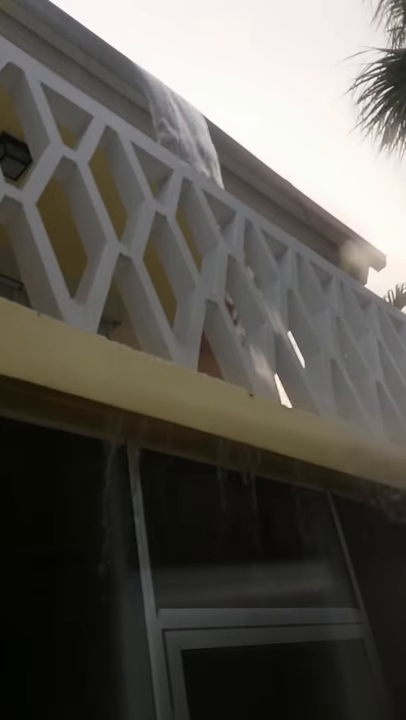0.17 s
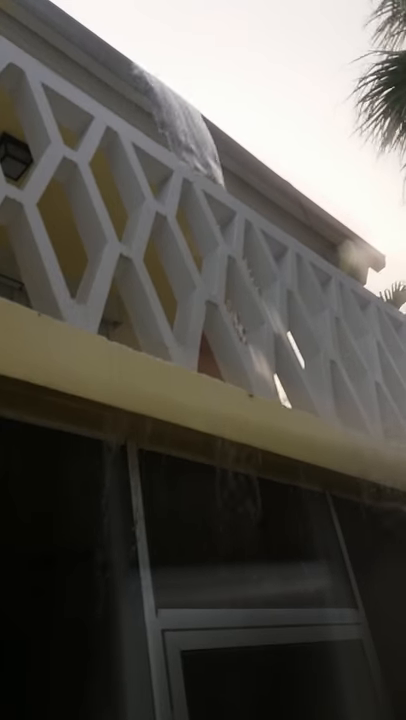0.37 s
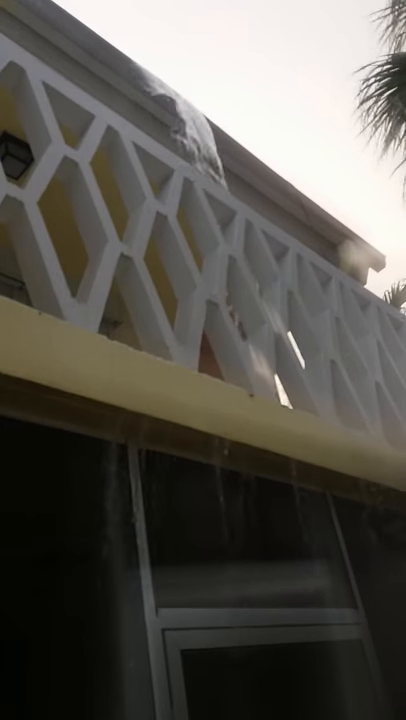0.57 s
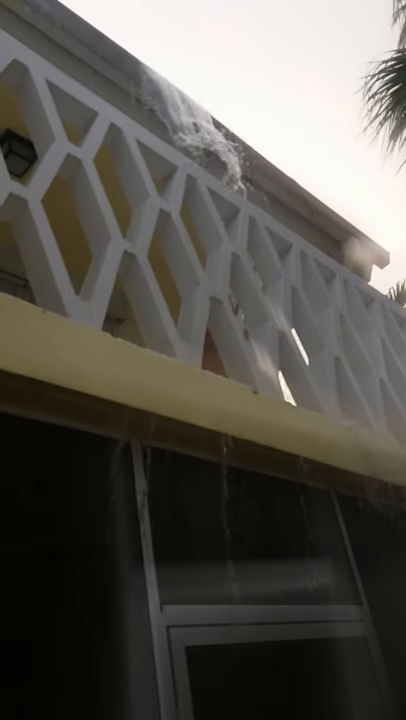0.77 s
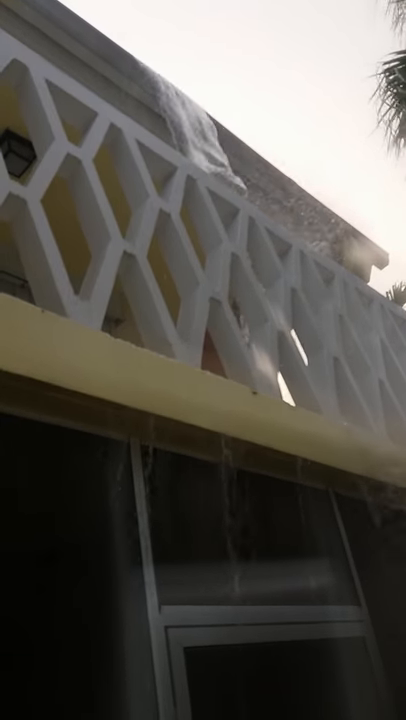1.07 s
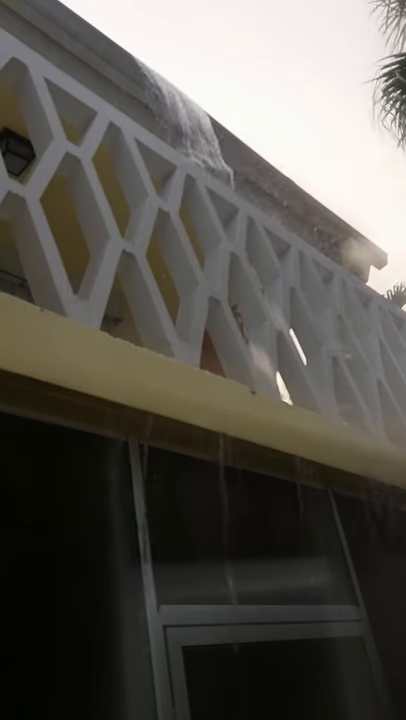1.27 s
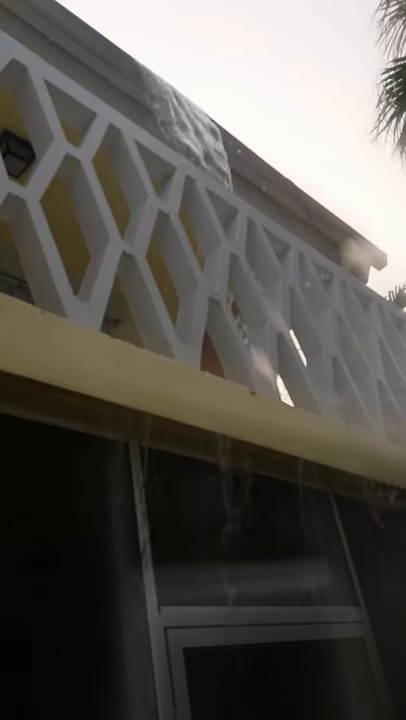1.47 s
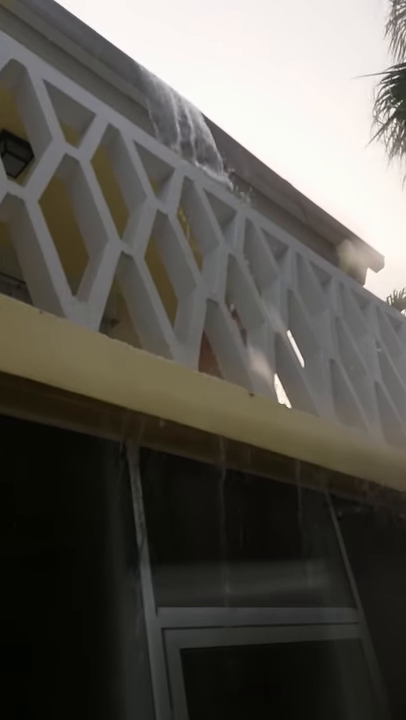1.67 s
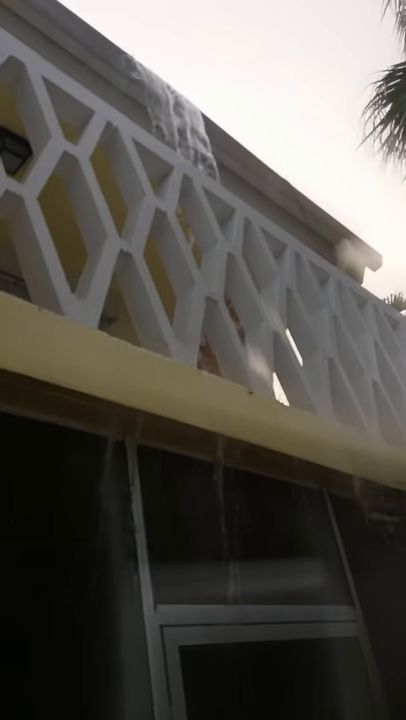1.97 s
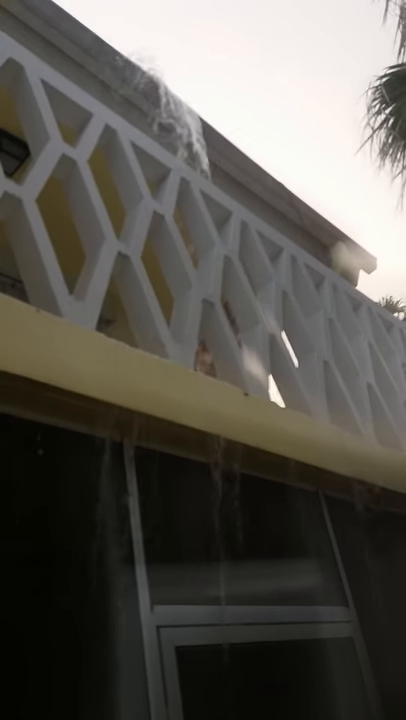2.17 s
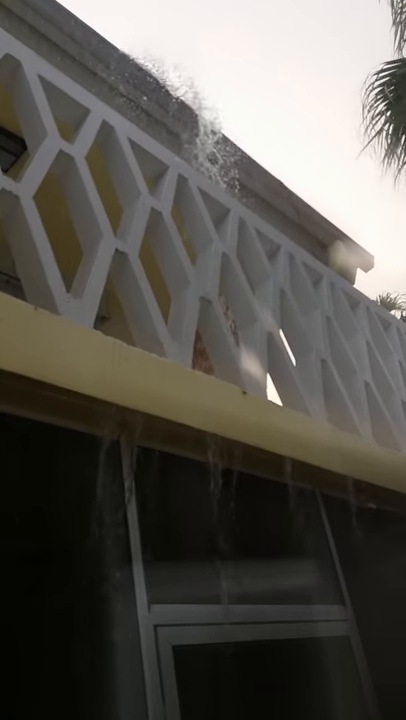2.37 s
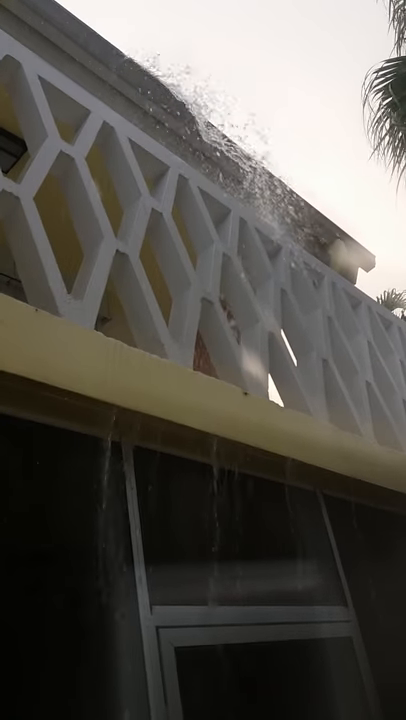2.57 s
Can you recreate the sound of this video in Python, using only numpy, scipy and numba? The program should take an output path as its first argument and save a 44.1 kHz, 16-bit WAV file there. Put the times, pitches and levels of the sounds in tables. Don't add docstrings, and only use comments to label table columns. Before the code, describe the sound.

Water pours off a roof gutter and splatters on a hard ledge, crackling, hissing and plinking; a drop knocks the phone early, the flow thins, then surges. Close outdoor stereo phone pickup, faint distant hum.

```python
import sys
import numpy as np
from scipy import signal
from scipy.fft import rfft, irfft
from scipy.io import wavfile
from scipy.ndimage import uniform_filter1d
from numba import njit

SR = 44100
rng = np.random.default_rng(int(sys.argv[2]) if len(sys.argv) > 2 else 0)


def volts(x):
    e = np.asarray(x, float) / 20
    return 10 ** e


def transcribe(u):
    v = np.clip(np.atleast_2d(u).T, -1, 1)
    q = np.round(v * 32767).astype(np.int16)
    wavfile.write(sys.argv[1], SR, q)


N = 120393

# f/Hz, level/dB
RUMBLE_COLOUR = [(15, -63), (25, -21), (75, -0.5), (130, -1.5), (243, 2), (291, 1.5), (358, 1.5),
                 (700, -8.5), (910, -4), (1540, -120)]
# f/Hz, level/dB rms, rise/(dB/s), dip t/s, dip span/s, dip depth/dB
HUM_PARTIALS = [
    (298.4, -56, 1, 1.87, 0.29, -19),
    (447.4, -68.5, 5.5, 0.91, .3, -11),
    (595, -90.5, 11.5, 1.1, .4, -7),
]
# t/s, peak level/dB, f/Hz, spread/s
PLINKS = [(0.031, -19, 2200, 0.0018), (0.105, -17, 2030, 0.014), (0.177, -27, 1920, 0.004),
          (0.208, -21, 1970.0, 0.0094), (0.321, -16, 3230, 0.0115), (0.361, -20, 2260, 0.018),
          (0.385, -20, 2770, 0.0013), (0.428, -19, 2070.0, 0.012), (0.546, -28, 2450.0, 0.01225),
          (0.708, -16.5, 1870, 0.01), (0.731, -17.0, 1985, 0.0024), (0.742, -19, 2370, 0.0012),
          (0.842, -31, 1850.0, 0.0015), (0.842, -18.0, 1710, 0.01362), (0.961, -19, 1680.0, 0.0026),
          (1.011, -25.5, 1710, 0.0175), (1.039, -25.0, 2270.0, 0.0027), (1.051, -28, 1820.0, 0.0018),
          (1.112, -24.0, 1820.0, 0.0024), (1.154, -21, 3000.0, 0.0025), (1.205, -28.5, 2340, 0.0037),
          (1.225, -30.0, 2290.0, 0.0044), (1.268, -29, 1980.0, 0.0055), (1.308, -23, 1940, 0.0106),
          (1.331, -19, 1830, 0.0053), (1.341, -20, 2580.0, 0.00834), (1.362, -24.5, 1710, 0.00346),
          (1.457, -24.5, 2530.0, 0.0069), (1.568, -26, 1570.0, 0.0061), (1.6, -35, 2820.0, 0.012),
          (1.635, -27, 2030.0, 0.0048), (1.718, -22.5, 2430.0, 0.0031), (1.736, -26.0, 2780.0, 0.0024),
          (1.856, -24.5, 2460, 0.005), (1.917, -25, 3110.0, 0.0098), (2.023, -26.5, 2470.0, 0.0115),
          (2.056, -17, 1700.0, 0.011), (2.071, -24.0, 2800, 0.0085), (2.133, -20.5, 1700.0, 0.0047),
          (2.209, -11, 1640, 0.004), (2.256, -23, 2660.0, 0.00405), (2.284, -10.5, 1880, 0.00458),
          (2.441, -25, 2370.0, 0.0108), (2.504, -27, 1580.0, 0.011), (2.565, -25, 2020.0, 0.0091),
          (2.597, -19.5, 1710.0, 0.0085), (2.632, -19, 2320, 0.0034),
          (.37, -20, 2500, .014), (0.386, -21, 2720, 0.015), (.435, -17, 2340, 0.0096),
           (.555, -25, 1700, .015), (.62, -22, 1800, 0.032), (.712, -19.5, 2250, .012),
           (.72, -17, 1950, 0.019), (.738, -24.5, 1900, 0.026), (.762, -22, 720, 0.012),
           (.85, -21, 1720, 0.0035), (2.065, -25, 1750, 0.024), (2.195, -27, 2120, .01),
           (2.215, -19, 850, 0.0055), (2.217, -18, 2300, .018), (2.29, -23, 1890, 0.019),
           (2.324, -21.5, 1850, 0.015), (2.606, -17, 1910, .022)]
# t/s, peak level/dB, spread/s
SPLASHES = [(0.028, 3.5, 0.00167), (0.054, 3.0, 0.004), (0.068, 1, 0.0019), (0.077, 2.5, 0.0105),
            (0.106, 2.5, 0.0058), (0.175, 2.5, 0.0026), (0.193, 2, 0.004), (0.341, 0, 0.00202),
            (0.373, 4.5, 0.0036), (0.417, 1, 0.0038), (0.429, 1, 0.0014), (0.545, 4.5, 0.01222),
            (0.626, 1.0, 0.0072), (0.698, 3, 0.00216), (0.721, 5.0, 0.0056), (0.74, -6, 0.0032),
            (0.833, -4, 0.0015), (0.83, 1.0, 0.017), (0.909, -4.5, 0.014), (0.961, 0, 0.0022),
            (0.986, -3.0, 0.0028), (1.007, 0.5, 0.01575), (1.033, 1.0, 0.00357), (1.048, -0.5, 0.0014),
            (1.061, -5.0, 0.0014), (1.111, -2.5, 0.0083), (1.16, -8, 0.0053), (1.268, -6, 0.0044),
            (1.33, -1.5, 0.019), (1.378, -3, 0.0014), (1.417, -8, 0.00557), (1.449, -7.5, 0.0049),
            (1.535, -7, 0.0035), (1.587, -2, 0.0014), (1.601, -0.5, 0.013), (1.624, -3, 0.0054),
            (1.727, 3, 0.0031), (1.737, 0, 0.0094), (1.787, -8, 0.0112), (1.899, -0.5, 0.0039),
            (1.915, 1, 0.0074), (1.961, -3.5, 0.0084), (2.009, -1, 0.004), (2.055, 2.0, 0.0027),
            (2.078, 1.5, 0.0015), (2.087, -0.5, 0.0013), (2.115, -5, 0.0041), (2.152, 2, 0.0013),
            (2.191, 0.5, 0.017), (2.254, 5.0, 0.0057), (2.265, 7, 0.0017), (2.281, 5.5, 0.0023),
            (2.301, 3.5, 0.0034), (2.318, 4.0, 0.0015), (2.331, 1, 0.0014), (2.399, 5.0, 0.0113),
            (2.497, 5.5, 0.0074), (2.611, 8.5, 0.0029), (2.63, 1, 0.016), (2.663, -4, 0.005)]
# t/s, level/dB, extra low gurgle level/dB
FLOW = [(0, -29.5, -1.5), (.06, -26.5, -1), (.27, -26.5, -1.5), (.38, -25, -1.5), (.54, -27, -1),
        (.6, -28, 0.5), (.72, -29, -1.5), (.85, -30, 0), (.95, -33, -2.5), (1.1, -33.5, -1),
        (1.25, -35, 0.5), (1.45, -33, 0), (1.7, -32.5, 0.5), (1.9, -29, 0), (2.15, -26.5, -0.5),
        (2.33, -25.5, 0.5), (2.55, -24, -1), (2.73, -23, 0.5)]
# f/Hz, level/dB
LEFT_COLOUR = [(150, -39), (500, -6.5), (900, -1.5), (1900, 0), (3000, -2.5), (5000, -14), (9500, -4),
               (16000, -5)]
# f/Hz, level/dB
RIGHT_COLOUR = [(150, -26), (500, -10), (1000, -2), (1900, -0.5), (2700, 1.5), (6000, 5.5), (9800, 0.5),
                (16000, 2.5)]
# f/Hz, width/Hz, level/dB
PORT_PEAKS = [
    (7930, 1750, 12),
    (7614, 1420, 8),
]

LEFT_LAG_S = .00043
KNOCK_S = .5985


def unit(x):
    return x / np.sqrt(np.mean(x ** 2))


def butter(x, order, hz, kind="low"):
    return signal.sosfilt(signal.butter(order, hz, kind, fs=SR, output="sos"), x)


def walk(rate_hz):
    hold = int(SR / rate_hz)
    levels = np.repeat(rng.standard_normal(N // hold + 1), hold)
    w = uniform_filter1d(levels, hold)[:N]
    return w / w.std()


def gain_at(table, hz):
    table_hz, table_db = np.array(table).T
    return np.interp(np.log(hz + 1), np.log(table_hz), table_db)


def colour(x, db_of):
    cepstrum = irfft(db_of(np.fft.rfftfreq(2048, 1 / SR)) * np.log(10) / 20)
    cepstrum[1:1024] *= 2
    cepstrum[1025:] = 0
    return signal.fftconvolve(x, irfft(np.exp(rfft(cepstrum))))[:N]


@njit
def grains(at_s, lag_s, hz, cycles, size, glide, n, sr):
    lead_in = 64
    out = np.zeros((2, n + 4096))
    for g in range(len(at_s)):
        for c in range(2):
            place = at_s[g] * sr + (lag_s[g] * sr if c == 0 else 0.) + lead_in
            i = int(place)
            w = 2 * np.pi * hz[g] / sr
            step = np.exp(1j * w - w / cycles[g])
            rise = np.exp(1j * w * w * glide / cycles[g] / 6)
            z = size[c, g] * step ** (1 - place + i)
            for k in range(min(int(6 * cycles[g] / w) + 1, 3000)):
                out[c, i + 1 + k] += z.imag
                z *= step
                step *= rise
    return out[:, lead_in:n + lead_in]


def drops(at_s, lo_hz, cycles, scatter_db, glide, size=1.):
    n = len(at_s)
    pitch, source, rank, sign = rng.random((n, 4)).T
    lag_g, cycles_g, pan_g = rng.standard_normal((n, 3)).T
    hz = lo_hz * (18000 / lo_hz) ** pitch
    lag_spread_s = np.where(source < .35, .00003, .0013)
    lag_s = np.clip(LEFT_LAG_S + lag_g * lag_spread_s, -.0014, .004)
    rarity = -np.log(rank + .007)
    big = size * volts(scatter_db * rarity) * hz / 1000 * np.sign(sign - .5)
    big = big * volts(np.outer([1, -1], 0.76 * pan_g))
    return grains(np.clip(at_s, 0, N / SR), lag_s, hz, cycles * volts(1.3 * cycles_g), big, glide, N, float(SR))


def rumble_db(hz):
    return np.where(hz < 1399, gain_at(RUMBLE_COLOUR, hz), -64)


def machine_hum(t):
    hum = 0
    for hz, db, rise_db, dip_s, span_s, dip_db in HUM_PARTIALS:
        dip = dip_db * np.exp(-((t - dip_s) / span_s) ** 2)
        level = volts(db + rise_db * t + dip + 0.52 * walk(7.8))
        phase = 2 * np.pi * np.cumsum(hz * (1 + 0.000626 * walk(3.03))) / SR
        hum = hum + np.sqrt(2) * level * np.sin(phase)
    return hum


def breeze(t):
    level_db = np.interp(t, [0, 1.2, 1.8, 2.73], [-77, -79, -87, -51.5])
    return unit(butter(rng.standard_normal((2, N)), 2, 75)) * volts(level_db)


def town(t):
    mid = unit(colour(rng.standard_normal(N), rumble_db))
    side = unit(colour(rng.standard_normal(N), rumble_db))
    flow_s, flow_db, _ = np.array(FLOW).T
    swell = volts(0.13 * walk(4.6) + 1.02 * (np.interp(t, flow_s, flow_db) + 29.0))
    rumble = volts(-53.5) * swell * (mid + 0.15 * side * np.array([[1], [-1]]))
    drone = unit(butter(rng.standard_normal(N), 1, [118, 138], "band"))
    drone = volts(-58.5 + 1.3 * walk(5.0)) * swell ** 0.86 * drone
    return rumble + machine_hum(t) + drone + breeze(t)


def knock(t):
    start_s, stretch, fade_s = .00013, 2.95, .003
    u = np.clip(t - KNOCK_S, 0, None)
    swing = -np.sin(np.pi * np.log(1 + u / start_s) / np.log(stretch))
    swing = swing * np.exp(-u / fade_s) * (u < .03)

    def ring(hz, ring_fade_s, db):
        envelope = u / ring_fade_s * np.exp(1 - u / ring_fade_s)
        return np.sin(2 * np.pi * hz * u) * envelope * volts(db)

    left = ring(2250, .0008, -19)
    right = volts(-9.5) * swing + ring(3100, .0013, -24)
    return np.array([left, right])


def plinks():
    bubbles = 12
    s, db, hz, spread_s = np.repeat(np.array(PLINKS), bubbles, axis=0).T
    g, late = rng.standard_normal((len(s), 3)).T, rng.random(len(s))
    lead = np.arange(len(s)) % bubbles == 0
    g, late = g * ~lead, late * ~lead
    pitch_hz = hz * (1 + 0.12 * g[0] * np.clip(spread_s / 0.012, .3, 1))
    cycles = np.where(lead, 15, 9) * hz / 1800 * volts(3.0 * g[2])
    rest_size = volts(db - 13.5 + 2.2 * g[1]) * np.sqrt(spread_s / 0.0068)
    lead_size = volts(db - 5.5) * np.sqrt(np.minimum(0.0036 / spread_s, 1))
    size = np.where(lead, lead_size, rest_size) * np.ones((2, 1))
    at_s = s - .0005 + late * np.clip(spread_s - .001, .0005, 1)
    return grains(at_s, LEFT_LAG_S + .00005 * g[2], pitch_hz, cycles, size, 0.058, N, float(SR))


def splashes():
    s, db, spread_s = np.repeat(np.array(SPLASHES), 100, axis=0).T
    late = rng.random(len(s)) ** 1.2
    size = volts(db - 42) * (spread_s / 0.0039) ** .25
    burst = drops(s - .0005 + spread_s * late, 2430, 1.453, 1.1, 0.12, size)
    return butter(burst * volts(2), 2, 1900, "high")


def hiss():
    hz = np.fft.rfftfreq(N, 1 / SR)
    left, right = rfft(rng.standard_normal((2, N)))
    alike = 0.32 / (1 + (hz / 3500) ** 2)
    delayed = right * np.exp(-2j * np.pi * hz * LEFT_LAG_S)
    spectra = np.array([np.sqrt(1 - alike ** 2) * left + alike * delayed, right])
    out = 0
    for octave in range(-1, 8):
        away = np.clip(np.log2(hz / 150 + 1e-9) - octave, -1, 1)
        band = irfft(spectra * np.cos(np.pi / 2 * away), N)
        out = out + band * volts(0.17 * walk(29) + 3.2 * walk(55))
    return out


def stream(t):
    tear_db = 0.2 * walk(44.97) + 0.32 * walk(110)
    crackle = drops(rng.random(22000) * N / SR, 350, 0.85, 3.3, 0.)
    fizz = drops(rng.random(12000) * N / SR, 340, 4.9, 2.6, 0.11)
    body = volts(-1.5) * unit(crackle) + volts(-3.5) * unit(fizz) + volts(-1.5) * unit(hiss())
    s, db, low_db = np.array(FLOW).T
    gurgle = butter(body, 2, 2500) * (volts(np.interp(t, s, low_db)) - 1)
    return (body + gurgle) * volts(np.interp(t, s, db) + tear_db - 5)


def port(x, tone, peak):
    peak_hz, width_hz, peak_db = peak
    return colour(x, lambda hz: gain_at(tone, hz) + peak_db / (1 + (2 * (hz - peak_hz) / width_hz) ** 2))


def scene():
    t = np.arange(N) / SR
    left, right = plinks() + splashes() + stream(t)
    heard = np.array([port(left, LEFT_COLOUR, PORT_PEAKS[0]), port(right, RIGHT_COLOUR, PORT_PEAKS[1])])
    duck = volts(-5 * np.exp(-((t - KNOCK_S) / .013) ** 2))
    return town(t) + knock(t) + volts(5) * heard * duck


def band_limit(x):
    return signal.sosfilt(signal.butter(12, 17010, fs=SR, output="sos"), x)


def record(dry):
    soft = .9 * np.tanh(dry / .9)
    top_cut = signal.ellip(10, .2, 80, 15850, fs=SR, output="sos")
    mix = signal.sosfilt(top_cut, soft)
    return band_limit(mix)


dry = scene()
out = record(dry)
transcribe(out)
```